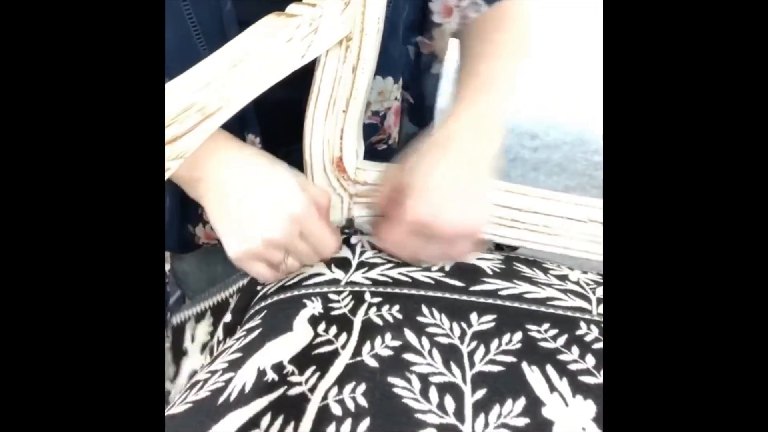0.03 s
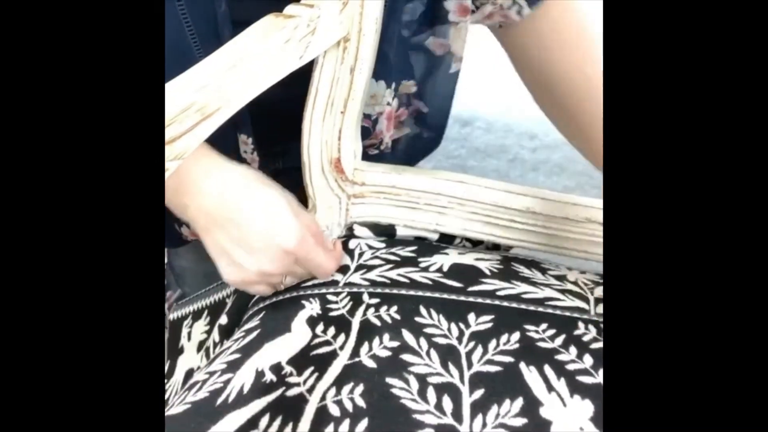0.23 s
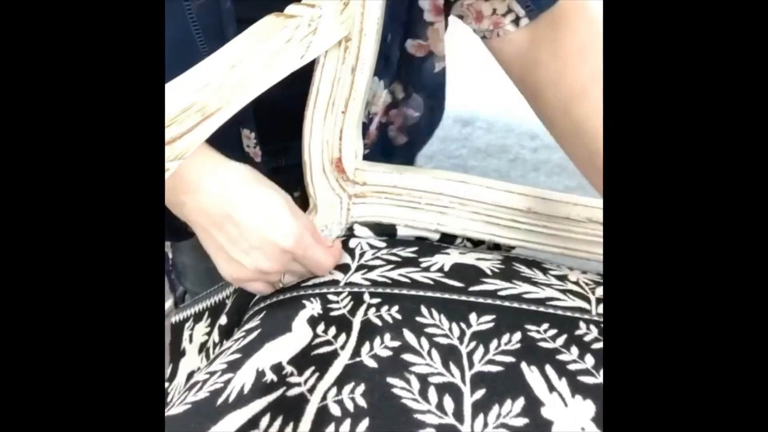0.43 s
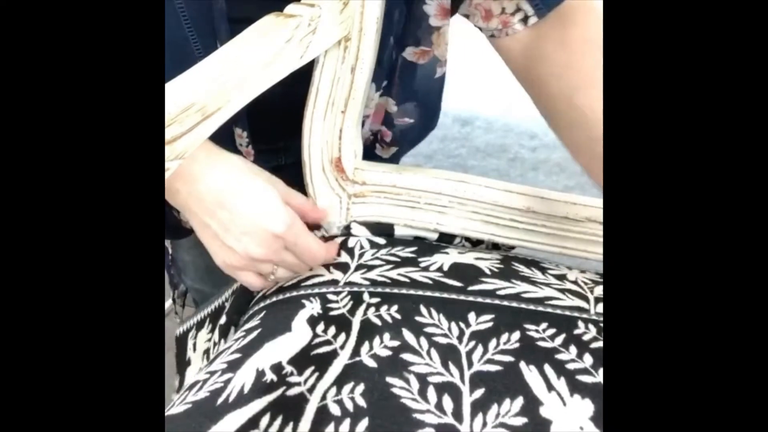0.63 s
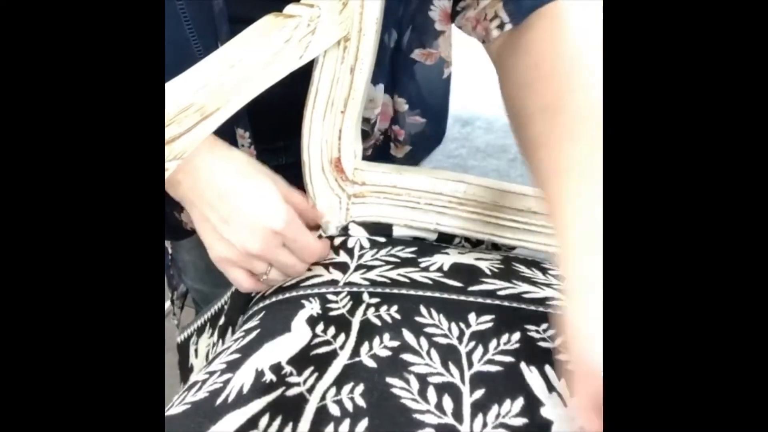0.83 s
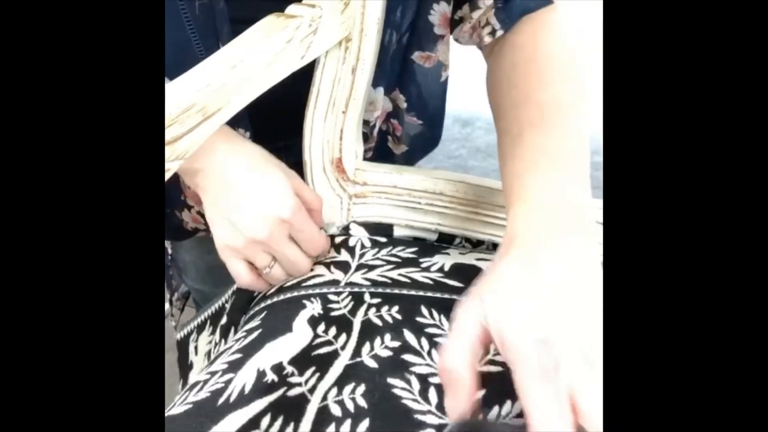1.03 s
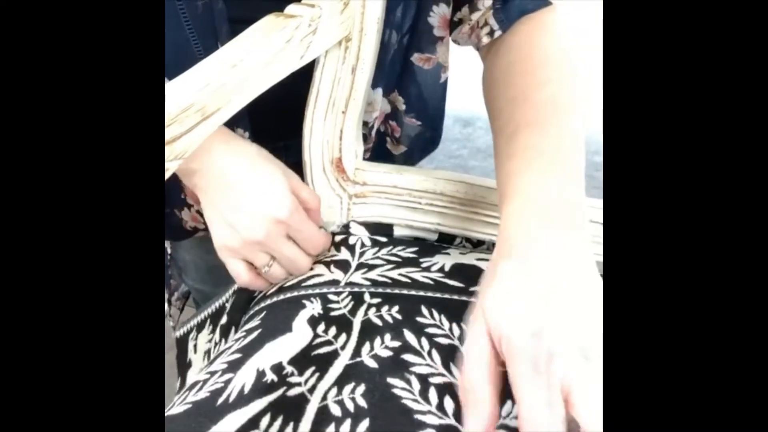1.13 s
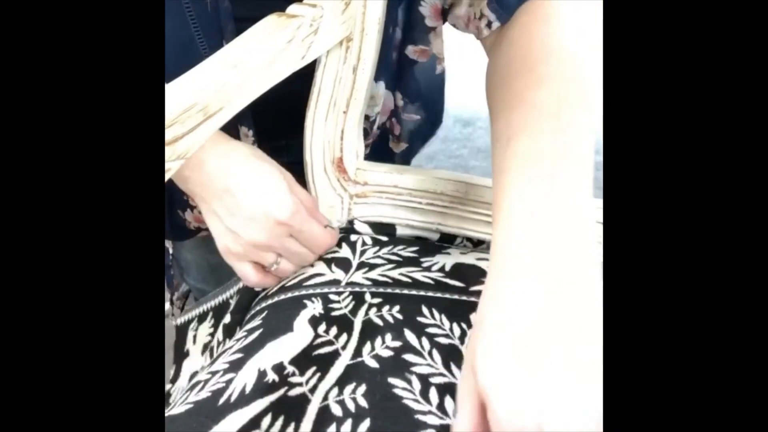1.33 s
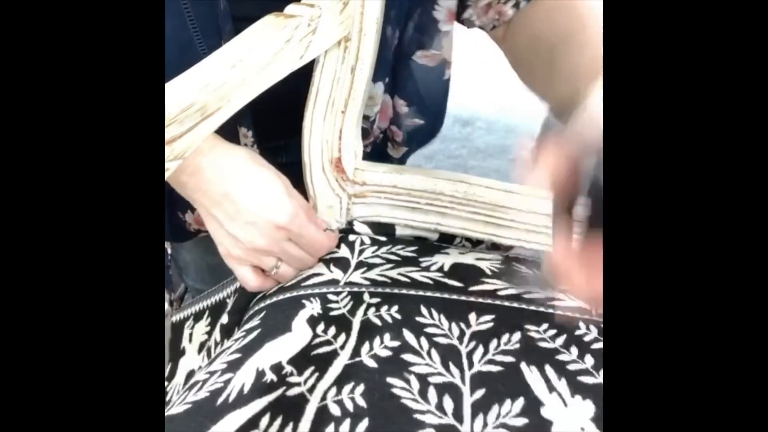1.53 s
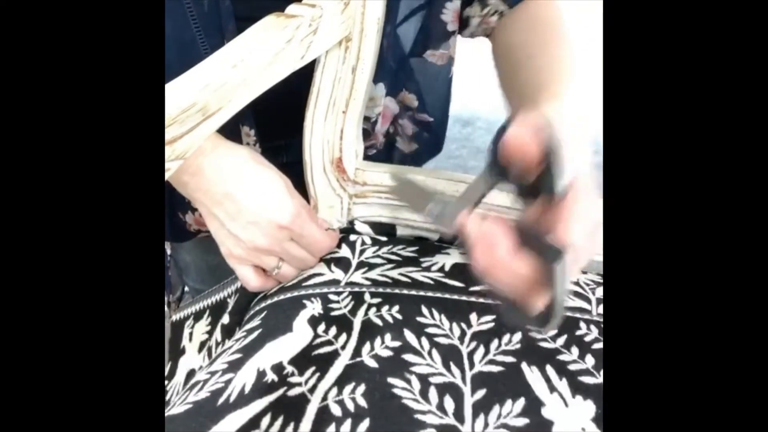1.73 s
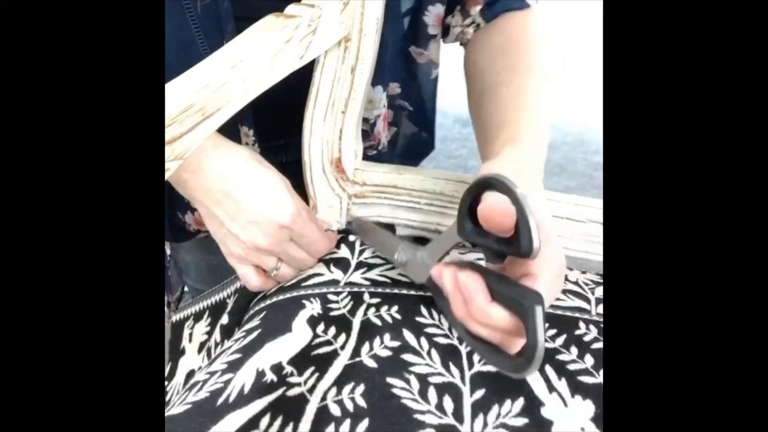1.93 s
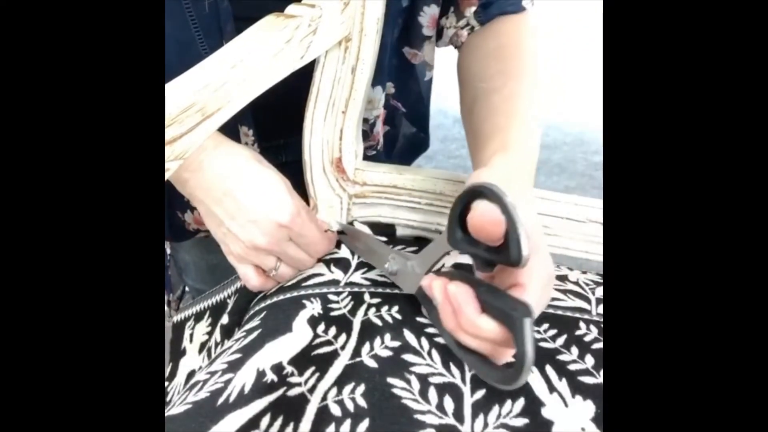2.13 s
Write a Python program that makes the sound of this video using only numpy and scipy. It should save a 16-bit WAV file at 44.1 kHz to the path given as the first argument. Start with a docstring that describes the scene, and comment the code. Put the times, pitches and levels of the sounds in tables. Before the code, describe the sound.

Cloth rubbing and creaking on a wooden chair frame, followed by scissors being picked up.

```python
"""Hands take hold of upholstery fabric with a faint metal ping and tuck it against a wooden chair post.
The cloth hisses, creaks and snaps; its slips and a few knuckle knocks ring the frame.
Then scissors are lifted off the seat with soft knocks, and the microphone stand sways in deep thumps.
A faint motor hum fades in after about a second and stays in the quiet room.
Last come a short drag of the scissor handles and a click of the blades."""
import sys
import numpy as np
from scipy import signal
from scipy.fft import rfft, irfft
from scipy.io import wavfile

SR = 44100
rng = np.random.default_rng(int(sys.argv[2]) if len(sys.argv) > 2 else 0)


def unload_wav(signal):
    """Save mono or channel-first audio to the path in sys.argv[1] as 16-bit WAV at rate SR, clipped to [-1, 1]."""
    wavfile.write(
        sys.argv[1],
        SR,
        np.round(np.clip(np.atleast_2d(signal).T, -1, 1) * 32767).astype(np.int16),
    )


N = 97020
T = np.arange(N) / SR

# chair frame modes: freq_hz, gain_db, t60_s
FRAME_MODES = [(129, -7.5, 0.076), (176.5, -4.5, 0.048), (231.6, -3.5, 0.062), (277.6, -6, 0.068),
               (400.5, -7, 0.066), (493.4, -3.5, 0.063), (637, -8.5, 0.04), (769, -4.5, 0.054),
               (896, -7, 0.072), (1073, -5.5, 0.038), (1249, -6, 0.028), (1575, -13, 0.056),
               (2138, -20.5, 0.11)]
# dense, short-lived ringing of the wood: freq_hz, gain_db
WOOD_SPECTRUM = [(80, -29), (200, 8.5), (1000, -0.5), (1500, -9.5), (2500, -12.5), (4000, -19.5),
                 (9000, -33)]
# finger pushes: start_s, rise_s, hold_s, level_db, bass_db
STROKES = [(0.168, 0.0022, 0.0055, -61, 12), (0.207, 0.022, 0.028, -38.5, -10),
           (0.266, .012, 0.015, -37.5, -8.5), (0.304, 0.007, 0.015, -46, -2),
           (0.355, 0.009, 0.033, -40.5, -8.5), (0.56, 0.014, 0.024, -49.5, 2.5),
           (0.678, 0.013, 0.069, -51, 1.5), (1.136, 0.034, 0.029, -55, 5)]
SLIPS_PER_S, SLIP_SPREAD_DB, FRICTION_DB, BASS_HZ = 2000, 3.5, -1.5, 390

def rubbing():
    """Cloth sticks and slips on the wood during each stroke and rings the frame; a flat hand adds bass."""
    out = np.zeros(N)
    for start_s, rise_s, hold_s, level_db, bass_db in STROKES:
        force = amp(level_db) * swell(start_s, rise_s, hold_s, decay_s=0.021)
        rub = scrape(force, FRAME_MODES)
        rub += amp(FRICTION_DB) * force * colour(grains(SLIPS_PER_S, SLIP_SPREAD_DB), WOOD_SPECTRUM)
        bass = signal.sosfiltfilt(signal.butter(2, BASS_HZ, fs=SR, output="sos"), rub + 1e-18)
        out += rub + (amp(bass_db) - 1) * bass
    return out


# taut cloth gripping the wood: start_s, level_db, pitch_hz
CREAKS = [(0.218, -32, 498), (0.2342, -30.5, 916), (0.250, -45, 990), (0.289, -32, 816),
          (0.304, -42, 547.5), (0.364, -35.5, 751.4), (0.382, -34, 1100), (0.397, -37.5, 391.2),
          (0.691, -48, 650), (0.722, -42.5, 851)]

def creaks():
    """For a few milliseconds the slips lock into a regular, wavering pitch."""
    out = np.zeros(N)
    for start_s, level_db, pitch_hz in CREAKS:
        waver = 0.053 * unit(soften(rng.standard_normal(N), corner_hz=195))
        cycles = np.cumsum(pitch_hz * (1 + waver)) / SR
        envelope = swell(start_s, rise_s=0.0043, hold_s=0, decay_s=0.0072)
        out += amp(level_db) * envelope * np.sin(2 * np.pi * cycles)
    return out


# cloth hiss envelope: time_s, level_db
HISS_LEVEL = [(.12, -82), (.18, -63), (.205, -68), (.236, -50), (.315, -56.5), (.345, -44.5), (.403, -47),
              (.42, -58), (.56, -62), (.61, -58), (.64, -66.5), (.71, -54.5), (.8, -57.5), (.88, -67),
              (.95, -68), (.985, -61.5), (1.05, -69), (1.075, -57.5), (1.125, -67.5), (1.19, -59),
              (1.236, -58), (1.254, -42.5), (1.275, -48.5), (1.3, -59), (1.322, -54), (1.365, -71),
              (1.415, -77.5), (1.46, -65), (1.51, -76), (1.55, -99)]
# brushing fibres: freq_hz, gain_db
HISS_SPECTRUM = [(1000, 3), (2400, 1), (3500, -3), (5500, -1.5), (7500, -5), (10000, -0.5), (12300, 0.5),
                 (14000, -7.5), (16000, -23)]
# thread snaps: start_s, level_db, decay_s, highpass_hz
SNAPS = [(0.252, -40, 0.00083, 1500), (0.2649, -40, 0.00077, 4000), (0.2979, -38.5, 0.00054, 2000),
         (0.3233, -33.5, 0.0012, 1500), (0.407, -44, 0.00088, 4000), (0.4359, -36, 0.0035, 4540),
         (0.592, -53, 0.001, 1500), (0.6111, -45.5, 0.0007, 1500), (0.619, -46, 0.0012, 3020),
         (1.255, -45.5, 0.0017, 3500)]
# snap noise: freq_hz, gain_db
SNAP_SPECTRUM = [(1500, 5), (2500, 4.5), (3800, -2.5), (5700, 3), (7000, -5.5), (11000, 0), (16000, -21)]
HISS_GAIN_DB, FIBRES_PER_S, FIBRE_SPREAD_DB = -3.5, 8300, 2.5

def cloth():
    """Fibres brush past each other; threads catch and snap free, finer ones sounding thinner."""
    crackle = colour(grains(FIBRES_PER_S, FIBRE_SPREAD_DB), HISS_SPECTRUM)
    out = amp(HISS_GAIN_DB) * level(HISS_LEVEL) * crackle
    crack = noise(SNAP_SPECTRUM)
    for start_s, level_db, decay_s, highpass_hz in SNAPS:
        snap = amp(level_db) * crack * dying(start_s, decay_s)
        out += signal.sosfilt(signal.butter(2, highpass_hz, "high", fs=SR, output="sos"), snap + 1e-18)
    return out


# blows on the frame: start_s, level_db, corner_hz
KNOCKS = [(0.168, -55, 1510), (0.2364, -44, 2410), (0.2522, -37, 2630), (0.325, -30, 198),
          (0.526, -50.5, 1500), (.592, -50, 3500), (.9000, -43, 1030), (.9058, -46.5, 4580),
          (0.909, -36, 163), (0.947, -40.5, 217), (1.0674, -48, 1910), (1.074, -39.5, 304),
          (1.252, -38.5, 234)]
CRACK_DB = 7

def knocks():
    """Knuckles and scissor handles strike the frame with a woody crack; softer contacts are duller."""
    out = np.zeros(N)
    frame = ringing(FRAME_MODES)
    for start_s, level_db, corner_hz in KNOCKS:
        blow = np.zeros(N)
        blow[int(start_s * SR)] = amp(level_db)
        crack = amp(CRACK_DB) * noise(WOOD_SPECTRUM) * dying(0, decay_s=0.0033)
        out += through(soften(blow, corner_hz), frame + crack)
    return out


# microphone stand sways: start_s, level_db, pitch_hz, decay_s
THUMPS = [(0.201, -37.5, 31, 0.018), (0.918, -26.5, 35.55, 0.043), (1.2227, -30, 43, 0.047),
          (1.393, -44, 37.6, 0.12)]
# handling rumble envelope: time_s, level_db
RUMBLE_LEVEL = [(0, -60), (.15, -61.5), (.24, -45), (.36, -46), (.48, -50), (.88, -52.5), (.95, -43.5),
                (1.04, -50), (1.2, -46), (1.26, -45.5), (1.37, -67.5), (1.75, -68.5)]
# handling rumble: freq_hz, gain_db
RUMBLE_SPECTRUM = [(20, 2), (35, -5), (60, -3.5), (110, -11.5), (200, -14), (400, -24), (900, -31.5),
                   (6000, -68)]

def stand_thumps():
    """Deep thumps of the microphone stand swaying, over low handling rumble."""
    sway = np.zeros(N)
    for start_s, level_db, pitch_hz, decay_s in THUMPS:
        envelope = swell(start_s, rise_s=0.027, hold_s=0, decay_s=decay_s)
        sway += amp(level_db) * envelope * np.sin(2 * np.pi * pitch_hz * (T - start_s))
    return sway + level(RUMBLE_LEVEL) * noise(RUMBLE_SPECTRUM)


# scissor handle modes: freq_hz, gain_db, t60_s
HANDLE_MODES = [(253, -2, 0.12), (1030, 5, 0.084), (1250, -1, 0.032), (1560, 7.5, 0.038),
                (1590, -10, 0.038)]
# handles rasping on cloth: freq_hz, gain_db
RASP_SPECTRUM = [(250, -25), (600, 14), (1000, 19), (1550, 5), (2200, -15), (5000, -29)]
DRAG_DB, RASP_GAIN_DB, CATCHES_PER_S = -48, -2, 990

def scissor_drag():
    """The handles catch on the cloth and ring as they drag off the seat."""
    force = amp(DRAG_DB) * swell(start_s=1.246, rise_s=0.007, hold_s=0, decay_s=0.024)
    ring = scrape(force, HANDLE_MODES)
    rasp = colour(grains(CATCHES_PER_S, FIBRE_SPREAD_DB), RASP_SPECTRUM)
    return ring + amp(RASP_GAIN_DB) * force * rasp


# blade contacts: start_s, level_db, grit_gain_db
CLICKS = [(1.4332, -55, 8), (1.437, -56.5, -1), (1.4398, -43.5, -5.5), (1.449, -60, 6)]
# blade modes: freq_hz, gain_db, t60_s
BLADE_MODES = [(923, -15, 0.049), (2404, -10, 0.04), (2670, -20, 0.17), (4150, 7, 0.0089),
               (4140, -12.5, 0.06), (5530, -6.5, 0.028)]
# steel on steel: freq_hz, gain_db
GRIT_SPECTRUM = [(2500, -11.5), (6800, -8.5), (8800, -0.5), (13000, -1.5), (16000, -24)]

def scissor_click():
    """The blades grind, then close with a short ring."""
    taps, grit_envelope = np.zeros(N), np.zeros(N)
    for start_s, level_db, grit_gain_db in CLICKS:
        taps[int(start_s * SR)] += amp(level_db)
        grit_envelope += amp(level_db + grit_gain_db) * dying(start_s, decay_s=0.0036)
    return through(taps, ringing(BLADE_MODES)) + grit_envelope * noise(GRIT_SPECTRUM)


def ping(start_s=0.174, level_db=-60.5, pitch_hz=2760, decay_s=0.022):
    """A small metal part rings briefly as the hands take hold."""
    return amp(level_db) * dying(start_s, decay_s) * np.sin(2 * np.pi * pitch_hz * (T - start_s))


# motor harmonics: multiple, level_db
HUM_HARMONICS = [(1, -60.5), (2, -68.5), (3, -76), (5, -83)]
# hum envelope: time_s, gain_db
HUM_GAIN = [(0, -58.5), (1.1, 0), (1.4, -0.5), (2.2, 3)]
# pitch waver: rate_hz, gain_db
WAVER_SPECTRUM = [(1, -3.5), (6, 2), (40, -48)]

def motor(pitch_hz=84.04, waver_rms=0.0078):
    """A distant motor's hum fades in, its pitch wavering slightly."""
    turns = np.cumsum(pitch_hz * (1 + waver_rms * noise(WAVER_SPECTRUM))) / SR
    hum = np.zeros(N)
    for multiple, level_db in HUM_HARMONICS:
        hum += amp(level_db) * np.sqrt(2) * np.sin(2 * np.pi * (multiple * turns + rng.random()))
    return hum * level(HUM_GAIN)


# room air: freq_hz, gain_db
AIR_SPECTRUM = [(15, -40), (25, -3), (91, -6), (150, -16), (380, -22), (1140, -27),
                (11800, -40), (15500, -55)]

def air(level_db=-64.5):
    """Still room air: a steady, low noise."""
    return amp(level_db) * noise(AIR_SPECTRUM)


def room(x, gain_db=-13, t60_s=0.41, delay_s=0.0091):
    """A furnished room adds a short diffuse tail."""
    tail = rng.standard_normal(N) * dying(delay_s, t60_s / np.log(1000))
    return x + amp(gain_db) * through(x, tail / np.linalg.norm(tail))


def scrape(force, modes):
    """Stick-slip impulses under a force ring a set of modes."""
    response = ringing(modes)
    slips = force * unit(grains(SLIPS_PER_S, SLIP_SPREAD_DB))
    return through(slips, response / np.linalg.norm(response))


def ringing(modes):
    """Impulse response of a set of modes, with alternating signs."""
    return sum((-1) ** k * amp(gain_db - 60 * T / t60_s) * np.sin(2 * np.pi * freq_hz * T)
               for k, (freq_hz, gain_db, t60_s) in enumerate(modes))


def grains(per_s, spread_db):
    """Random impulses of uneven size."""
    sizes = amp(spread_db * np.minimum(rng.exponential(1, N), 4))
    signs = rng.choice([-1, 1], N)
    return sizes * signs * (rng.random(N) < per_s / SR)


def colour(x, spectrum):
    """Shape a signal by (freq_hz, gain_db) points; rms 1."""
    freq_hz, gain_db = np.transpose(spectrum)
    bins_hz = np.maximum(np.fft.rfftfreq(N, 1 / SR), 1)
    gain = amp(np.interp(np.log(bins_hz), np.log(freq_hz), gain_db))
    low_cut = np.minimum(bins_hz / freq_hz[0], 1)
    return unit(irfft(rfft(x) * gain * low_cut, N))


def noise(spectrum):
    """Coloured noise of rms 1."""
    return colour(rng.standard_normal(N), spectrum)


def soften(x, corner_hz):
    """Second-order low-pass."""
    return signal.sosfilt(signal.butter(2, corner_hz, fs=SR, output="sos"), x + 1e-18)


def through(x, response):
    """Convolve with an impulse response."""
    return signal.fftconvolve(x, response)[:N]


def swell(start_s, rise_s, hold_s, decay_s):
    """Envelope that rises, holds and decays."""
    attack = np.clip((T - start_s) / rise_s, 0, 1)
    return attack * np.exp(-np.maximum(T - start_s - rise_s - hold_s, 0) / decay_s)


def dying(start_s, decay_s):
    """Envelope that jumps to 1 and decays."""
    return (T >= start_s) * np.exp(-np.maximum(T - start_s, 0) / decay_s)


def level(points):
    """Gain over time from (time_s, level_db) points."""
    return amp(np.interp(T, *np.transpose(points)))


def amp(db):
    """Decibels to gain."""
    return 10 ** (np.asarray(db) / 20)


def unit(x):
    """Scale to rms 1."""
    return x / np.sqrt(np.mean(x ** 2) + 1e-20)


def scene():
    """Mono mix; only the contact sounds get the room tail."""
    contacts = rubbing() + creaks() + knocks() + cloth() + ping() + scissor_click() + scissor_drag()
    return (room(contacts) + stand_thumps() + motor() + air())[None]


CUTOFF_HZ = 15800

def record(dry):
    """Steep zero-phase low-pass."""
    return signal.sosfiltfilt(signal.butter(16, CUTOFF_HZ, fs=SR, output="sos"), dry)


dry = scene()
out = record(dry)
unload_wav(out)
```